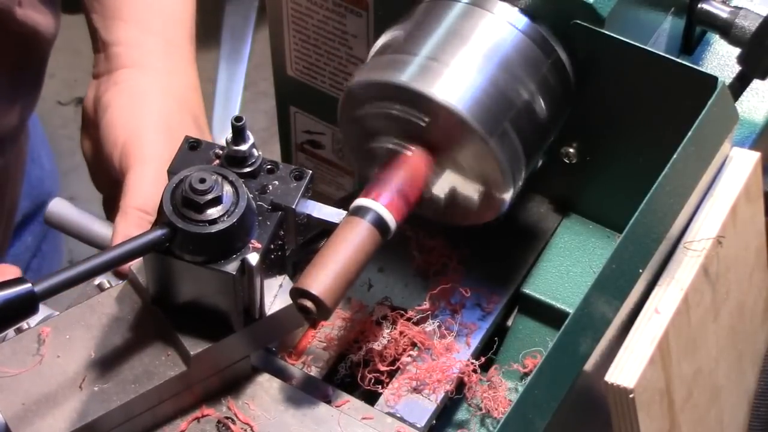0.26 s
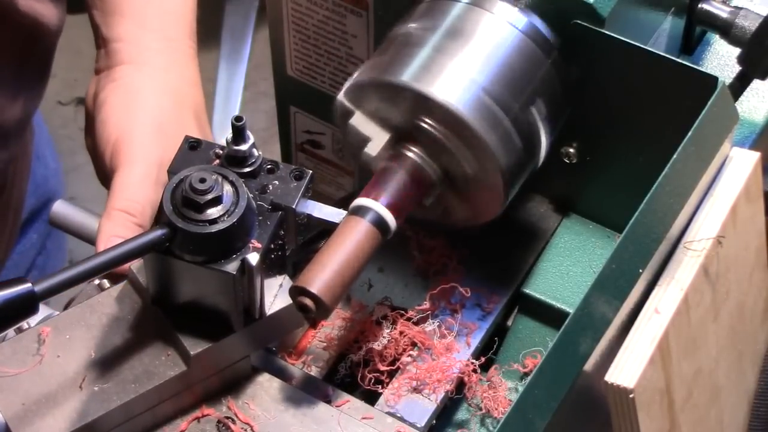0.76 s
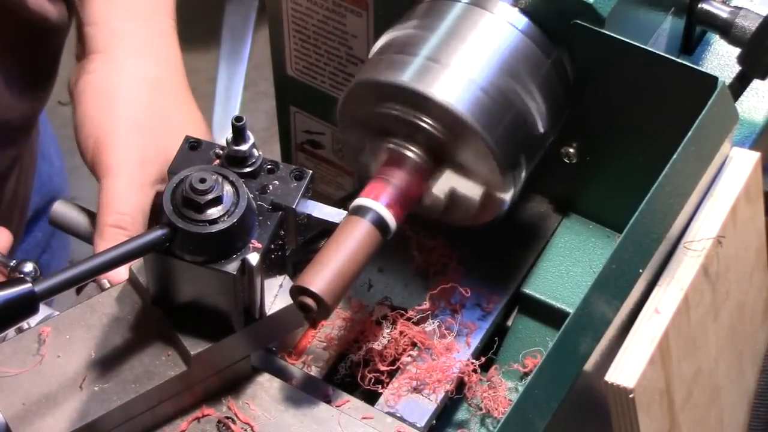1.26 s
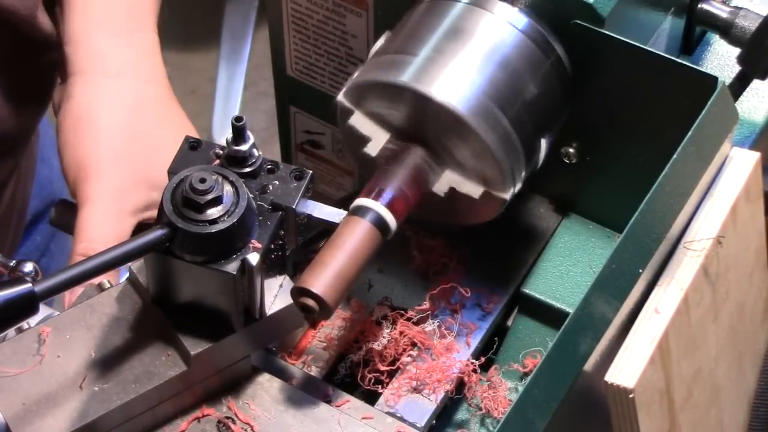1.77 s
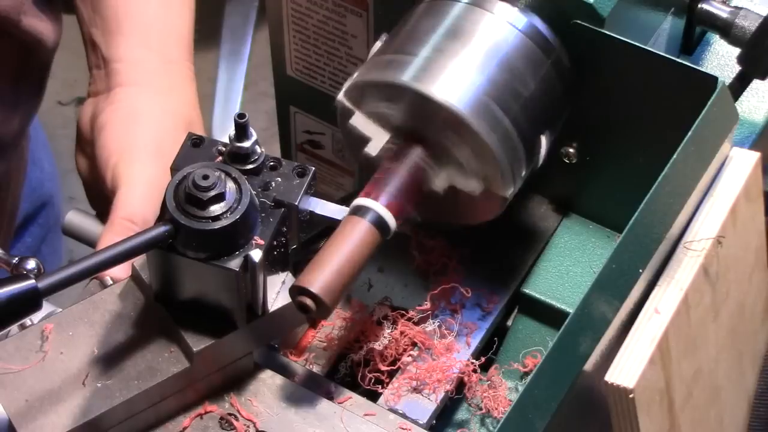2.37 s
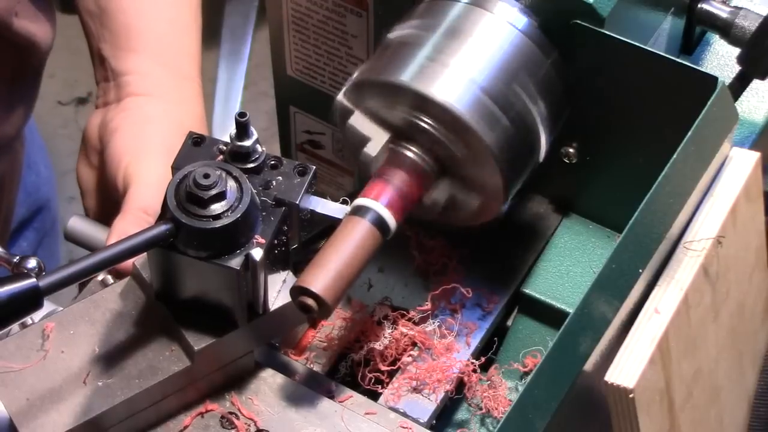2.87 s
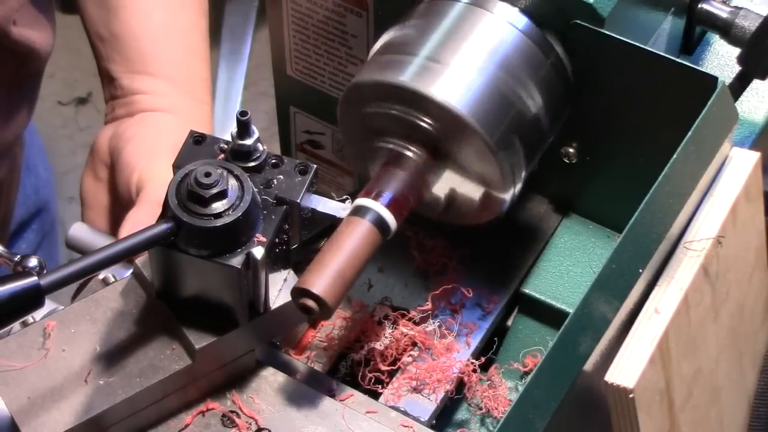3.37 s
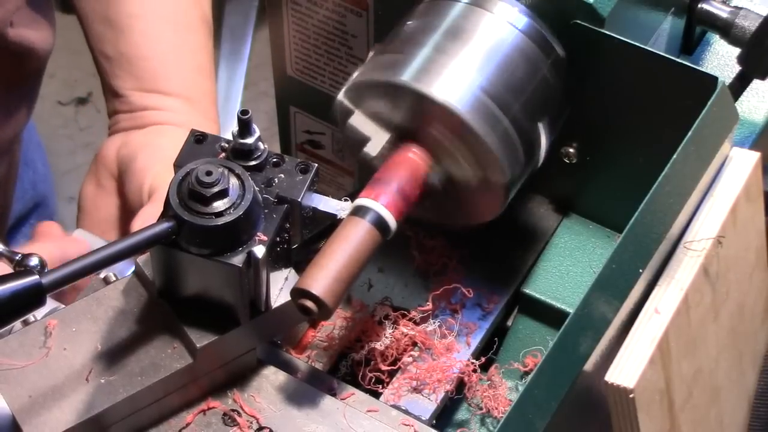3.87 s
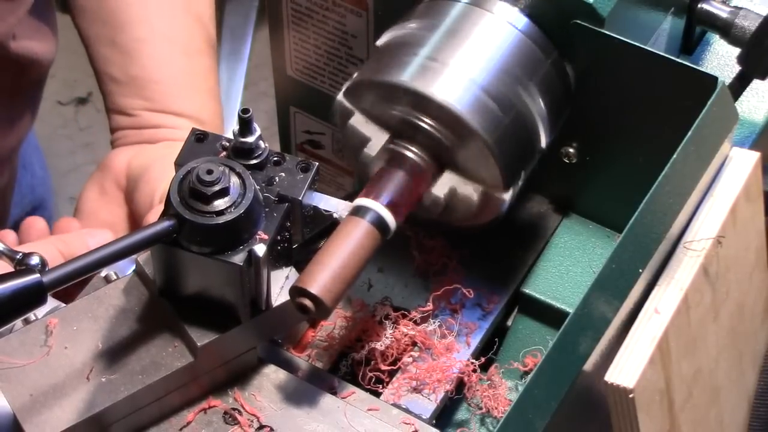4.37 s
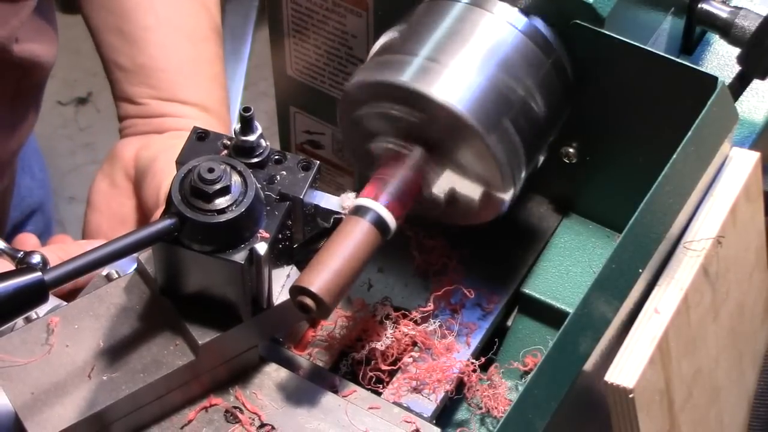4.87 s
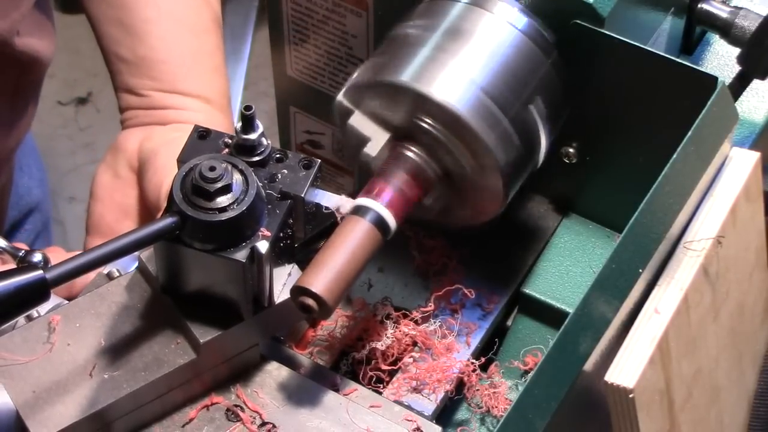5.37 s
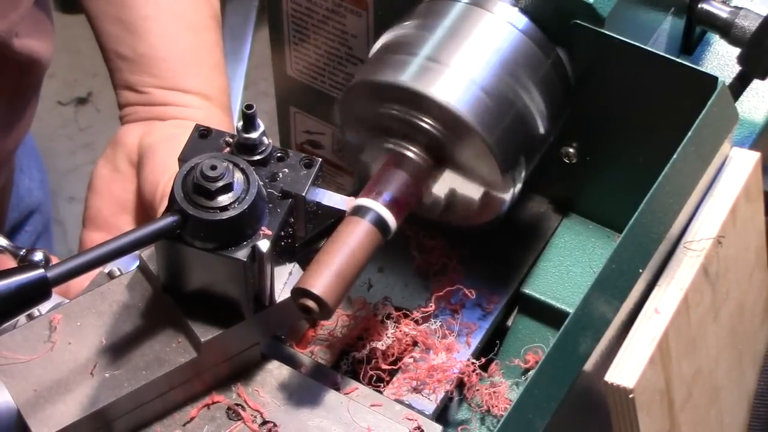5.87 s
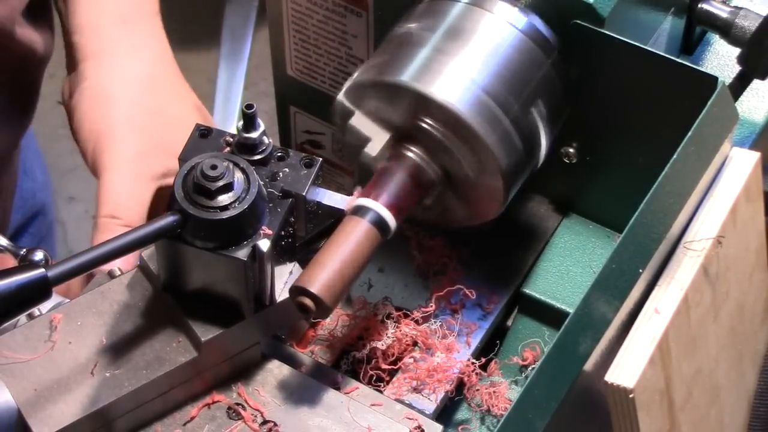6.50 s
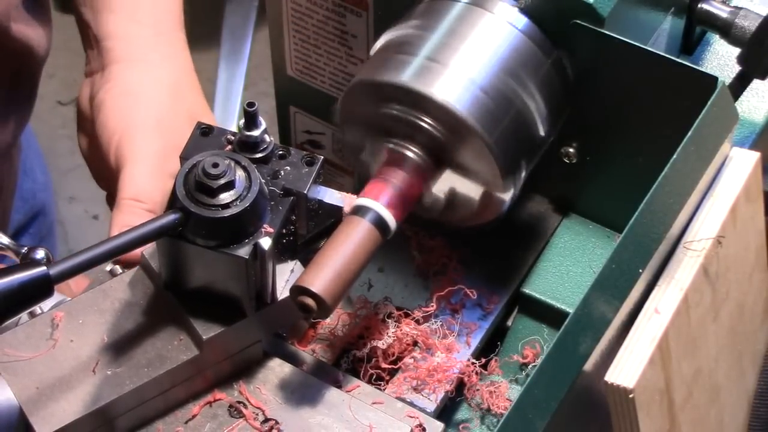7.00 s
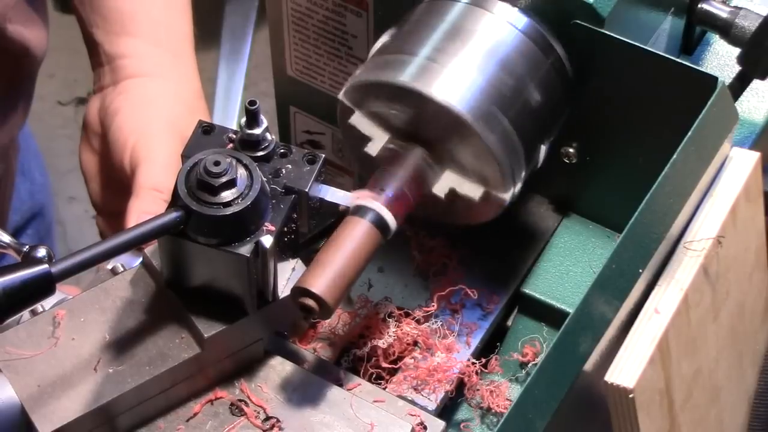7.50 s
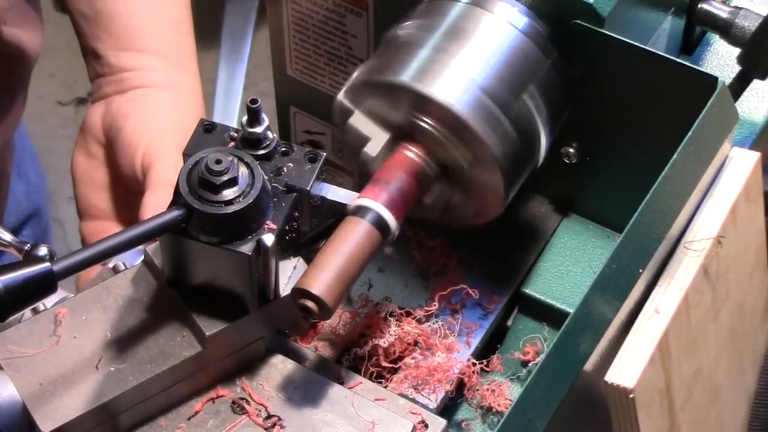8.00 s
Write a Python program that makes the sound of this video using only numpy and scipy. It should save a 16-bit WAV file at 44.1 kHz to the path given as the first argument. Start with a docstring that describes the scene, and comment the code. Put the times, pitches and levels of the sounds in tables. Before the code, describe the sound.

Close up in a workshop, a running lathe whirrs steadily, then its cutting tool adds fast, shrill, pulsing squeals and scrapes.

```python
"""A small metal lathe in a workshop, heard close up on one microphone with a little room behind it.
From the start the drive hums and whines over whirring, rattling gears. From about 2 s the tool meets an
out-of-round workpiece once a turn: it sticks and slips in a scratchy squeal that falls in pitch as the
bite deepens and shrieks on crossing the tool holder's resonance. From about 4 s the passes are lighter
and scratchier, and slack in the gears clacks near 4.7 s and 7.7 s."""
import sys
import numpy as np
from scipy import signal
from scipy.fft import rfft, irfft, next_fast_len
from scipy.io import wavfile
from scipy.ndimage import uniform_filter1d

SR = 44100
rng = np.random.default_rng(int(sys.argv[2]) if len(sys.argv) > 2 else 0)


def file_out(sig):
    """Save sig as 16-bit WAV at sys.argv[1]."""
    # one column per channel
    cols = np.atleast_2d(sig).T
    # limit, then scale
    lim = np.clip(cols, -1, 1)
    pcm = np.round(lim * 32767).astype(np.int16)
    wavfile.write(sys.argv[1], SR, pcm)


N = 363825
TIME = np.arange(N) / SR
SPINDLE_HZ = 5.568

# spectrum of gear teeth knocking together: freq_hz, relative_db
TOOTH_SPECTRUM = [(300, -31), (700, -3), (1600, -3.5), (3200, 1.5), (4500, -12), (6000, -17), (9000, -23),
                  (15000, -37)]


def cut(squeal_db=-2.0, scrape_db=-3.5, gating=0.6, grit_db=3.0, shudder_db=-47):
    """Slips and chip noise excite the tool; a deeper bite slips slower and harder and shakes the bed."""
    # broad response of the tool and holder: freq_hz, gain_db
    tool_response = [(500, -46), (2300, -22), (2800, 1.5), (5000, -3.5), (7000, -8.5), (10000, -10),
                     (13000, -9.5), (14200, -16), (15500, -25)]
    # their resonances: freq_hz, width_hz, boost_db
    tool_modes = [(3545, 203, 13.2), (3810, 222, 17.2), (4232, 123, 12.6), (4490, 230, 5.6),
                  (5830, 130, 4.1), (6300, 420, 3.1), (6770, 170, 4.2), (8470, 390, 7.9), (9200, 480, 8.6),
                  (11650, 1060, 10.3)]
    # the chip tearing away: freq_hz, gain_db
    chip_spectrum = [(30, -18), (120, -22), (1200, -7), (2500, -17), (3700, -8.5), (5000, -4.5), (7000, -1),
                     (10000, 1), (13000, 3.5), (15500, -3)]
    # dull shudder of the bed under the cutting force: freq_hz, relative_db
    bed_spectrum = [(20, 9), (60, -11), (120, -1), (300, -17), (1000, -62)]
    slip_hz, squeal, scrape = contact()
    bite = 5000 / slip_hz
    pulses, phase = stick_slip(slip_hz)
    pulses = pulses * squeal * bite ** 0.57 * gain_of(squeal_db)
    chips = rng.standard_normal(N) * (1 + gating * np.cos(phase))  # tearing in step with the slips
    chips *= gain_of(grit_db * wander(500))
    chips = colour(chips * scrape * bite ** 0.55 * gain_of(scrape_db), chip_spectrum)
    force = uniform_filter1d(scrape * bite ** 2, size=600)
    shudder = unit_rms(colour(rng.standard_normal(N), bed_spectrum)) * force
    tool = colour(pulses + chips, tool_response, tool_modes, ripple_db=2.5)
    return tool + gain_of(shudder_db) * shudder


def contact(graze_hz=13020, slowest_hz=2750, bites_s=2.167, skate_db_per_s=215):
    """Slip rate, squeal and scrape strength as a hand feeds the tool onto one high side, then the other."""
    # uneven feed for the deep, chirping passes: time_s, relative_depth
    deep_feed = [(2.04, 0.5), (2.08, 5.5), (2.32, 6.2), (2.43, 3.5), (2.65, 3), (2.83, 3.1), (3.01, 3.5),
                 (3.19, 4), (3.37, 3.2), (3.73, 3), (3.94, 3), (4.02, .72), (4.12, 0.9), (4.16, 0)]
    # feed for the lighter, scratchier passes: time_s, relative_depth
    light_feed = [(4.07, 0), (4.15, 1.7), (4.38, 2), (4.58, 2.24), (4.76, 1.15), (4.94, 1.6), (5.11, 1.1),
                  (5.29, 1.87), (5.48, 2.5), (5.65, 0.77), (5.83, 1.85), (6.02, 1.73), (6.13, 0.64),
                  (6.58, 0.25), (6.66, 2.85), (6.73, 2.24), (6.91, 1.5), (7.09, 1.67), (7.27, 2.22),
                  (7.45, 2.5), (7.63, 1.63), (7.99, 2.34), (8.17, 1.84)]
    # high side with one hump: place_in_pass, share_of_pass, relative_height
    round_side = [(.5, .335, 1.0)]
    # high side with two humps: place_in_pass, share_of_pass, relative_height
    twin_side = [(.28, .22, .52), (.702, .16, .95)]
    deep = passes(deep_feed, round_side, middle_s=3.1912, length_s=.085, usual_depth=3.17, widen=.07,
                  squeal_db=-29.1, squeal_db_per_depth=9.5, scrape_db=-27.0, scrape_db_per_depth=2.0)
    light = passes(light_feed, twin_side, middle_s=5.4543, length_s=.105, usual_depth=1.8, widen=.04,
                   squeal_db=-26.2, squeal_db_per_depth=2.0, scrape_db=-21.0, scrape_db_per_depth=5.8)
    depth, squeal, scrape = deep + light
    slip_hz = np.maximum(graze_hz / (1 + depth), slowest_hz)
    skate = gain_of(skate_db_per_s * np.minimum(TIME - bites_s, 0))  # the edge skates until it bites
    return slip_hz, squeal * skate, scrape * skate


def passes(feed, humps, middle_s, length_s, usual_depth, widen, squeal_db, squeal_db_per_depth,
           scrape_db, scrape_db_per_depth, swell_db=2.5, fade=.18, release=0.69, release_db=-9):
    """A high side sweeps past the edge once a turn; the feed sets how long and how hard it cuts."""
    depth = np.maximum(follow(feed), 0)
    from_middle_s = (((TIME - middle_s) * SPINDLE_HZ + .5) % 1 - .5) / SPINDLE_HZ
    pass_s = length_s * (1 + widen * np.maximum(depth - usual_depth, 0))
    progress = np.clip(.5 + from_middle_s / pass_s, 0, 1)
    outline = sum(height * np.exp(-((progress - place) / width) ** 2) for place, width, height in humps)
    from_ends = 2 * np.minimum(progress, 1 - progress)
    taper = np.sin(np.pi / 2 * np.minimum(from_ends / fade, 1)) ** 2
    skim = np.minimum(depth, 1) ** 1.9  # below depth 1 the edge only skims and its sound fades
    touch = taper * skim * gain_of(swell_db * (progress - .5))
    push = np.clip(depth - usual_depth, -0.72, 0.72)
    leaving = np.maximum((progress - release) / (1 - release), 0)
    squeal = touch * gain_of(squeal_db + squeal_db_per_depth * push + release_db * leaving)
    scrape = touch * gain_of(scrape_db + scrape_db_per_depth * push)
    return np.array([depth * outline * taper, squeal, scrape])


def stick_slip(hz, jitter=.052, shake=0.55, db_per_octave=-5.0, lock_hz=3850, width_hz=420, lock_db=5.5):
    """Slip pulses: steadier and stronger near the holder's resonance, ragged in the deepest bites."""
    lock = np.exp(-((hz - lock_hz) / width_hz) ** 2)
    unrest = 1 - .6 * lock + np.clip((3050 - hz) / 100, 0, 2.5)
    phase = 2 * np.pi * np.cumsum(hz * (1 + jitter * unrest * wander(695))) / SR
    pulses = np.cos(phase) * gain_of(lock_db * lock)
    for k in range(2, 6):
        alias_fade = np.clip((SR / 2 - k * hz) / 4000 - .5, 0, 1)
        pulses += gain_of(db_per_octave * np.log2(k)) * np.cos(k * phase) * alias_fade
    strength = np.exp(shake * (1 - lock) * wander(510))
    return np.sqrt(2) * pulses * strength, phase


def steel_ring(tool):
    """After a shriek, close, lightly damped modes beat against each other as they die away."""
    # modes of the machine's steel: freq_hz, gain_db, t60_s
    steel_modes = [(3680, -14, .2), (3620, -19, .22), (3750, -14, 0.5), (4000, -18, .3), (4600, -18, 0.22)]
    ring = np.zeros(N)
    for hz, db, t60 in steel_modes:
        decay = gain_of(-60 / (t60 * SR))
        pole = decay * np.exp(2j * np.pi * hz / SR)
        ring += 2 * gain_of(db) * signal.lfilter([1 - decay], [1, -pole], tool).real
    return ring


def gears():
    """The gear train whirrs and rattles, both throbbing five times a spindle turn."""
    throb = np.sin(2 * np.pi * (5 * SPINDLE_HZ * TIME + rng.random()))
    return gear_whirr(throb) + gear_rattle(throb)


def gear_whirr(throb, lift_db=3, throb_db=0.83, uneven_db=2.0):
    """Meshing teeth make a noise that resonates in the headstock."""
    # broad spectrum of the gear train: freq_hz, relative_db
    mesh_spectrum = [(30, -73), (90, -38), (160, -34), (240, -17), (400, -9), (750, -10), (1250, -14),
                     (2000, -20.5), (3000, -21), (4300, -26.5), (5700, -38), (8800, -36), (12000, -43),
                     (15500, -58)]
    # headstock resonances: freq_hz, width_hz, boost_db
    headstock_modes = [(573.4, 55, 5.9), (646.5, 125, 13.5), (949, 240, 14.66), (1620, 270, 5.3),
                       (2224, 40, 10), (2572, 45, 7.2), (6800, 800, 3.2)]
    # strength of the whirr before lift_db: time_s, level_db
    whirr_levels = [(0, -29), (1.8, -29), (2.4, -27), (4, -28), (5, -27.5), (6.3, -28), (8.25, -27)]
    load = gain_of(throb_db * throb + uneven_db * wander(57))
    whirr = colour(rng.standard_normal(N) * load, mesh_spectrum, headstock_modes, ripple_db=4.5)
    return unit_rms(whirr) * gain_of(follow(whirr_levels) + lift_db)


def gear_rattle(throb, ticks_per_s=900, burst_db=4, uneven_db=4.5, scatter_s=0.0039):
    """Loose teeth tick in short bursts; each tick scatters briefly through the casting."""
    # how hard the teeth tick: time_s, level_db
    rattle_levels = [(0, -45), (2, -44.5), (4, -41.5), (5, -48.5), (6.4, -45.5), (8.25, -54)]
    sizes = gain_of(np.minimum(rng.exponential(1, N), 3)) * rng.choice([-1, 1], N)
    bursts = gain_of(burst_db * throb + uneven_db * wander(60))
    ticks = sizes * bursts * (rng.random(N) < ticks_per_s / SR)
    scatter = rng.standard_normal(SR // 20) * np.exp(-TIME[:SR // 20] / scatter_s)
    rattle = colour(signal.oaconvolve(ticks, scatter)[:N], TOOTH_SPECTRUM)
    return unit_rms(rattle) * gain_of(follow(rattle_levels))


def gear_clacks(decay_s=0.0065):
    """A tooth takes up its slack with a short knock."""
    # the harder knocks: start_s, relative_db
    knocks = [(4.653, -23), (7.707, -20.5)]
    blows = sum(gain_of(db) * (TIME >= s) * np.exp(-abs(TIME - s) / decay_s) for s, db in knocks)
    return blows * unit_rms(colour(rng.standard_normal(N), TOOTH_SPECTRUM)) / 2


def drive(ripple_hz=119.98, drift=0.002304):
    """The hum is locked to the mains; the whine follows the slightly uneven shaft speed."""
    # hum of the motor on rectified mains: ripple_multiple, level_db
    hum_lines = [(1, -70.5), (2, -40), (3, -39.5), (4, -49), (5, -25), (6, -43.5), (8, -34.5), (9, -49.5)]
    # whine of the shafts and gear meshes: pitch_hz, level_db
    whine_lines = [(161, -63.5), (170, -64), (295.1, -38), (442.6, -43.5), (549, -44), (590.2, -34),
                   (629, -36), (649, -42), (661, -43), (838, -42.5), (901, -36.5), (927, -43.5),
                   (995, -41.5), (1382, -48), (1568, -54), (1706, -50.5), (2804, -59.5)]
    speed_drift = drift * wander(5.97)
    hum = sum(tone(k * ripple_hz, db, flutter=0.049) for k, db in hum_lines)
    whine = sum(tone(hz, db, flutter=0.19, drift_hz=hz * speed_drift) for hz, db in whine_lines)
    return hum + whine


def workshop(sound, near_db=-13, tail_db=-13, near_decay_s=0.0093):
    """Direct sound reaches the microphone, then reflections off the bed and guard, then the room."""
    # the room's short decay: freq_hz, t60_s
    room_decay = [(200, 0.26), (1000, 0.61), (3800, 0.29), (7000, 0.23), (14000, 0.057)]
    t = TIME[:SR // 2]
    near, tail = rng.choice([-1., 1.], (2, len(t))) * (rng.random((2, len(t))) < 3000 / SR)
    near = near * np.exp(-t / near_decay_s) * (t > .001)
    hz, age_s, bands = signal.stft(tail * (t > .006), SR, nperseg=256)
    bands *= gain_of(-60 * age_s / at_frequency(room_decay, hz)[:, None])
    tail = signal.istft(bands, SR, nperseg=256)[1][:len(t)]
    near = gain_of(near_db) * near / np.linalg.norm(near)
    tail = gain_of(tail_db) * tail / np.linalg.norm(tail)
    return sound + signal.oaconvolve(sound, near + tail)[:N]


def tone(hz, db, flutter, drift_hz=0):
    """A sine whose strength flutters and whose pitch may drift."""
    turns = np.cumsum(np.full(N, hz) + drift_hz) / SR + rng.random()
    return np.sqrt(2) * gain_of(db) * np.sin(2 * np.pi * turns) * (1 + flutter * wander(8.1))


def colour(sound, spectrum, modes=(), ripple_db=0, size=4096):
    """Causal filter: a broad spectrum, resonant peaks that ring on, and a ripple of many small modes."""
    hz = np.fft.rfftfreq(size, 1 / SR)
    db = at_frequency(spectrum, hz)
    db += sum(boost * .5 ** ((2 * (hz - centre) / width) ** 2) for centre, width, boost in modes)
    ripple = np.convolve(rng.standard_normal(len(hz)), np.hanning(13), "same")
    db += ripple_db * unit_rms(ripple) * np.clip(hz / 5000 - .5, 0, 1)  # small modes crowd the treble
    log_gain = np.log(gain_of(np.r_[db, db[-2:0:-1]]))
    taps = np.fft.ifft(np.exp(np.conj(signal.hilbert(log_gain)))).real  # minimum phase
    return signal.oaconvolve(sound, taps)[:N]


def wander(hz):
    """A smooth random curve of rms 1, moving no faster than about hz."""
    size = next_fast_len(N)
    lowpass = np.exp(-(np.fft.rfftfreq(size, 1 / SR) / hz) ** 2)
    return unit_rms(irfft(rfft(rng.standard_normal(size)) * lowpass, size)[:N])


def at_frequency(points, hz):
    """Reads a table on a log-frequency axis."""
    freqs, values = np.transpose(points)
    return np.interp(np.log(hz + 1), np.log(freqs), values)


def follow(curve):
    """Reads a curve at every sample."""
    return np.interp(TIME, *np.transpose(curve))


def gain_of(db):
    """Decibels to amplitude."""
    return 10 ** (np.asarray(db) / 20)


def unit_rms(x):
    """Scales to rms 1."""
    return x / np.sqrt(np.mean(x ** 2) + 1e-20)


def scene():
    """Beside the lathe, in mono: the cut and its echoes over the running machine."""
    tool = cut()
    machine = drive() + gears() + gear_clacks()
    return (workshop(tool + steel_ring(tool)) + machine)[None]


def record(dry, ceiling=.92, cutoff_hz=15750):
    """The recorder softly rounds off the loudest shrieks, then cuts the highest treble."""
    rounded = dry / (1 + (dry / ceiling) ** 6) ** (1 / 6)
    lowpass = signal.firwin(511, cutoff_hz, window=("kaiser", 9), fs=SR)
    return signal.oaconvolve(rounded, lowpass[None], "same")


dry = scene()
out = record(dry)
file_out(out)
```